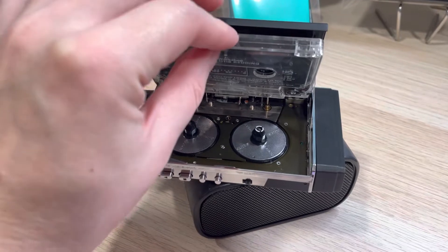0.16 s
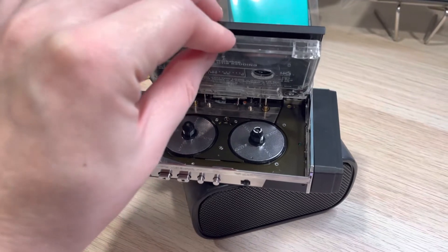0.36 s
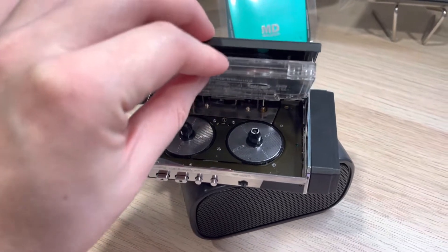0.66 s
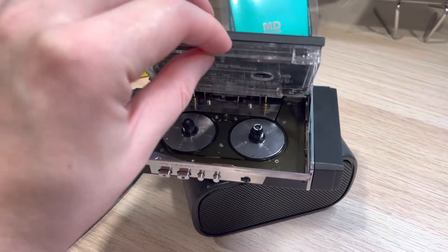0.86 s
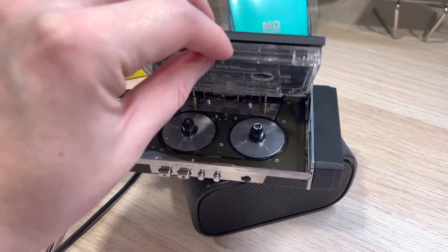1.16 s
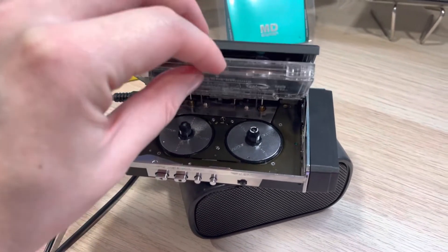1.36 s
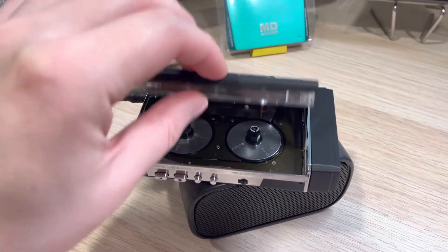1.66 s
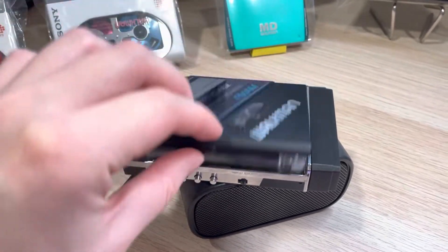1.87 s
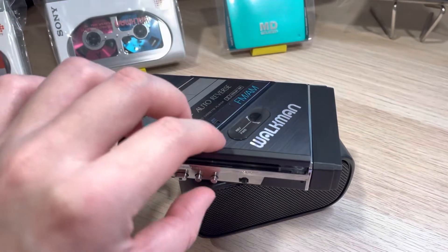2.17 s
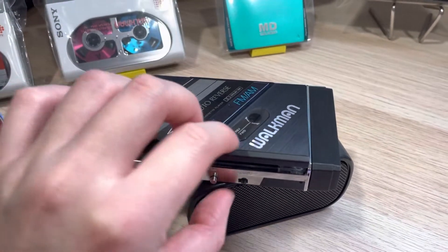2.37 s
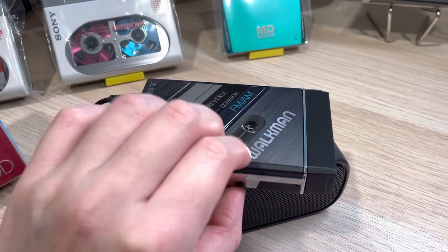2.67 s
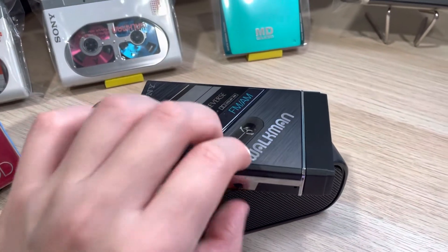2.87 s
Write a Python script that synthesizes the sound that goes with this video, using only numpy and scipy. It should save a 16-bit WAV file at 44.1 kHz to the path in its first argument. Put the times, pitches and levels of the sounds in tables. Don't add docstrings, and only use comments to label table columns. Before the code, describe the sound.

A plastic cassette is fitted into a small player, heard close in a quiet room with low hum. Small clicks and a brief scrape come near 0.4 seconds, light ticks at 0.8, and a sharp clack at 1.45. Rubbing leads to rattling clicks around 1.8-1.9, then near quiet. At 2.66 the latch snaps loudly, with a hollow low thump dying away quickly.

```python
import sys
import numpy as np
from scipy import signal
from scipy.fft import rfft, irfft
from scipy.io import wavfile
from scipy.ndimage import uniform_filter1d

SR = 44100
rng = np.random.default_rng(int(sys.argv[2]) if len(sys.argv) > 2 else 0)


def transcribe(signal):
    frames = np.atleast_2d(signal).T
    limited = np.clip(frames, -1, 1)
    pcm = np.round(limited * 32767).astype(np.int16)
    wavfile.write(sys.argv[1], SR, pcm)


def voltage_ratio(decibels):
    exponent = np.asarray(decibels, float) / 20
    return 10 ** exponent


N = 132300

# (frequency [Hz], level [dB per Hz])
HUSH_SPECTRUM = [(45, -8.5), (60, 0.5), (92, -13.5), (277, -14), (384, -23.5), (530, -16.5), (887, -36.5),
                 (16000, -65)]
# (frequency [Hz], likeness [0-1])
LIKENESS = [(60, 1), (240, 0.79), (950, 0.37), (4000, 0.13), (7000, 0.92)]
# (frequency [Hz], width [Hz], level [dB])
HUMS = [(57.7, 12.8, -54.5), (117.9, 30.6, -59), (248, 24, -78.5)]
# (start [s], length [s], level [dB], brightest [Hz], swell [0-1])
SCRAPES = [(0.013, 0.042, -69, 5940, 0.56), (0.043, 0.06, -70, 7000, 0.75), (0.374, 0.029, -47, 2500, 0.65),
           (0.401, 0.066, -74, 3030, 0.66), (0.513, 0.16, -65, 2290, 0.44),
           (0.767, 0.13, -68.5, 2350, 0.05), (1.12, 0.15, -81, 1450, 0.64),
           (1.293, 0.068, -62.5, 2360, 0.56), (1.413, 0.0533, -40.5, 2850, 0.83),
           (1.46, 0.017, -52, 1300, 0.4), (1.492, 0.15, -63, 2030, 0.76), (1.604, 0.15, -53.5, 3900, 0.67),
           (1.68, .15, -54.5, 2250, 0.69), (1.819, 0.042, -54.5, 2200, 0.21), (1.856, 0.055, -48, 2750, 0),
           (1.872, 0.028, -68, 4020, 0.7), (1.877, 0.032, -73, 2000, 0.2), (1.91, 0.026, -55, 3000, 0.77),
           (2.351, 0.13, -87, 5540, 0.67), (2.509, 0.058, -62.5, 2180, 0.08),
           (2.599, 0.036, -61.5, 2460, 0.52), (2.631, 0.035, -42, 1720, 0.83),
           (2.666, 0.013, -39.5, 2500, 0.05), (1.544, 0.45, -71, 10000, 0.4), (2.675, 0.13, -61, 3500, 0),
           (2.356, 0.075, -76.5, 9800, .4), (2.98, .02, -75.5, 3050, 1)]
# (start [s], length [s], level [dB], frequency [Hz], width [Hz])
SINGING_EDGES = [(0.02, 0.031, -58, 5060, 2500), (0.514, 0.043, -64.5, 1960, 252),
                 (.52, 0.15, -71.5, 2500, 130), (0.573, 0.076, -67.5, 1890, 250),
                 (1.3, 0.05, -68, 2550, 70), (1.419, 0.02, -62, 2590, 200), (1.675, 0.027, -56.5, 3980, 60),
                 (1.694, .025, -65, 1290, 200), (1.711, .03, -53, 4374, 70),
                 (1.735, 0.028, -53.5, 3360, 120), (1.727, 0.052, -83, 2350, 120),
                 (1.857, .014, -42.5, 2780, 200), (2.106, 0.024, -85, 5000, 200),
                 (2.246, 0.37, -86.5, 5150, 500), (0.869, 0.043, -76, 2324, 80)]
# (frequency [Hz], level [dB], t60 [s])
TRAY_MODES = [(610, -14, .03), (1020, -1.5, 0.044), (1253, -2.5, 0.05), (2030, 6.5, 0.0058),
              (2500, -5, 0.035), (3900, -20, .035), (4324, -7, 0.036), (5200, -5, 0.017),
              (6400, -10.5, 0.0053), (7130, -13, 0.028), (10140, 6, 0.0017), (11340, -3, .012)]
# (time [s], peak [dB], ring [Hz], brightness [dB per octave])
SHELL_TICKS = [(0.2007, -51, 1030, -8), (0.2076, -48, 2160, -6.5), (0.327, -44.5, 2040, -5.5),
               (0.3808, -32.5, 2110, -5), (0.3925, -28, 1550, -0.5), (0.3964, -33, 1590, -3.5),
               (0.7788, -45.5, 1300, -4), (0.7952, -34, 1680, -1), (0.819, -35, 2450, -3),
               (0.8259, -35.5, 6600, 1), (0.8321, -43.5, 1220, -1), (0.9488, -55.5, 980, 0.5),
               (1.171, -56, 1530, 2.5), (1.3018, -37.5, 1820, -2), (1.4453, -33, 1300, 6),
               (1.4574, -20.5, 1490, -0.5), (1.4668, -36.5, 1230, 1), (1.6222, -49, 1020, 0),
               (1.6454, -39, 4700, 3), (1.8188, -34.5, 1513, -6), (1.8487, -32, 1660, -10.5),
               (1.8551, -35.5, 2600, -1), (1.8812, -27, 1057, -3), (1.8953, -30.5, 3000, -3.5),
               (1.923, -43.5, 990, 12), (1.9275, -45, 2880, 15), (2.2537, -65.5, 1220, 2),
               (2.402, -49.5, 5200, 1), (2.5138, -61, 2010, -1), (2.6587, -24, 2160, -5.5)]
# (time [s], peak [dB], ring [Hz], brightness [dB per octave])
CATCH_CLICKS = [
    (0.816, -46, 11100, -15),
    (1.822, -38, 11150, 26),
    (1.8846, -21.5, 9900, 5),
    (2.6643, -18, 2110, 2),
    (2.6638, -18, 5000, 14.5),
    (2.6655, -20.5, 10230, 4.5),
]
# (time [s], peak [dB], ring
# [Hz], brightness [dB per octave])
FURTHER_TICKS = [(0.029, -50, 5200, 24), (0.094, -58, 4540, 2), (.529, -45, 1950, -3), (1.435, -50, 2600, -9),
                 (1.585, -43, 1610, 0), (1.699, -35.5, 3900, -5), (1.8495, -31.5, 5000, -1),
                 (1.8548, -35, 5000, -7), (1.8925, -35.5, 5200, -3), (2.515, -56, 1800, 1.5),
                 (2.547, -51.5, 2300, -2), (2.613, -42.5, 2500, -9.5), (2.623, -41, 4000, -9.5),
                 (2.6539, -32, 845, -7), (2.6591, -26, 775, -7.5), (2.682, -39.5, 7000, 3.5),
                 (2.812, -61.5, 2030, -0.5)]
# (frequency [Hz], level [dB], t60 [s])
SHELL_MODES = [(761, 0, 0.073), (1160, 2.5, 0.016), (1588, 1, 0.03), (1985, -11, 0.022), (2910, 6, 0.033),
               (3300, -10, 0.023), (4450, -12.5, 0.022), (5000, 0.5, 0.038), (6120, -7.5, 0.029),
               (8090, 9.5, 0.026), (10400, 6, 0.0041), (10800, -14, 0.01)]
# (frequency [Hz], level [dB])
GRIT_SPECTRUM = [(300, -10.5), (1000, -6.5), (2500, 8), (5000, -0.5), (8000, 2), (11500, -2), (13500, -2.5),
                 (16000, -14.5)]
# (time [s], level [dB], upper modes [dB per octave], signed direction [gain])
THUMPS = [(0.219, -49.5, -6, 0.82), (0.391, -45, 12, 0.87), (0.421, -52.5, -19, -1.6),
          (0.558, -49.5, 9.5, 1), (.62, -36.5, -8.5, 0.84), (0.829, -41.5, -2, -1.1),
          (1.004, -38, -6.5, 0.95), (1.4602, -34, 5, 0.62), (1.468, -34.5, 11.5, 0.72),
          (1.591, -44.5, 8, 0.81), (1.819, -45, 12.5, 0.54), (1.856, -42, 16.5, -0.8),
          (1.887, -51.5, 19, 1), (1.898, -35.5, 11, 1), (1.918, -49, 0, 0.74), (2.405, -43, -10, 0.41),
          (2.513, -35.5, 10, 0.61), (2.6657, -20.5, -5, 1), (2.6669, -28.5, -9, -1.1),
          (2.6719, -14.5, 3, 0.99), (2.73, -35, -9.5, 1), (1.8268, -42.5, 17.5, 0.41),
          (1.835, -50, 15.5, 0.71), (1.867, -40.5, 15.5, 0.53), (1.91, -47, 11.5, 0.82),
          (1.942, -42, -5.5, 1), (2.6809, -21, -3.5, 0.34), (1.77, -44.5, 3.5, 0.92)]
# (frequency [Hz], level [dB], t60 [s])
BOX_MODES = [(62.8, -7.5, 0.37), (91, -4.5, 0.18), (122.5, 5.5, 0.08), (172.6, -12.5, 0.15),
             (244.1, -4, 0.088), (307.5, -11, 0.073), (594, -26.5, 0.04), (799, -26.5, .03)]
# (frequency [Hz], t60 [s])
ROOM_T60 = [(100, 0.37), (500, 0.34), (2000, 0.22), (8000, 0.15)]
# (frequency [Hz], lead [radians])
PORT_LEAD = [(60, 0), (2100, .7), (3150, 2.2), (3900, .5), (6200, -.1), (7750, -2.9), (8900, -3.3),
             (10600, -6), (11900, -6.6), (13700, -9.1), (16100, -10.1)]
# (frequency [Hz], left over right [dB])
PORT_BALANCE = [(60, -2.5), (180, -4.5), (550, -1), (1300, -2.5), (2400, 1), (4970, 4.5), (7800, 2.2),
                (15000, -0.5)]

HUSH_DB, ROOM_DB = -56.5, -15.5
SLIPS_PER_S, SLIP_SPREAD_DB = 20000, 1.5
TRAY_DB, SCRAPE_FALL_DB = -2.5, 2.5
CRACK_RISE_S, CRACK_DECAY_S = 0.00019, 0.0013
CRACK_DB, SHELL_DB, RING_DB = -4, -11, -11.5
RING_T60_S, RING_SHORTENING = 0.02, 0.54
PUSH_S = 0.0017
BASS_EDGE_HZ, TREBLE_EDGE_HZ = 52, 16500


def unit_rms(x):
    return x / np.sqrt(np.mean(x ** 2) + 1e-20)


def read(points, hz):
    f, value = np.transpose(points)
    return np.interp(np.log(hz + 1), np.log(f + 1), value)


def add(mix, start_s, sound):
    part = mix[round(start_s * SR):][:len(sound)]
    part += sound[:len(part)]


def shaped(x, gain):
    hz = np.fft.rfftfreq(x.shape[-1], 1 / SR)
    return irfft(rfft(x) * gain(hz), x.shape[-1])


def resonant(x, center_hz, width_hz):
    return unit_rms(shaped(x, lambda f: 1 / (1 + (2 * (f - center_hz) / width_hz) ** 2)))


def rung(modes, length_s, upper_db=0, detune=1):
    hz, db, t60_s = np.transpose(modes)[:, :, None]
    t = np.arange(0, length_s, 1 / SR)
    level_db = db + upper_db * np.log2(hz / hz[2]) - 60 * t / t60_s
    return (voltage_ratio(level_db) * np.sin(2 * np.pi * hz * detune * t)).sum(0)


def paired(a, b):
    def same(f):
        return np.clip(read(LIKENESS, f), 0, 1)

    right = shaped(a, same) + shaped(b, lambda f: np.sqrt(1 - same(f) ** 2))
    return np.array([a, right])


def air():
    noise = paired(*rng.standard_normal((2, N)))
    out = voltage_ratio(HUSH_DB) * unit_rms(shaped(noise, lambda f: voltage_ratio(read(HUSH_SPECTRUM, f))))
    for hz, width_hz, db in HUMS:
        out += voltage_ratio(db) * resonant(rng.standard_normal(N), hz, width_hz)
    return out


def stick_slip():
    hits = rng.random(N) < SLIPS_PER_S / SR
    strength = rng.standard_normal(N) * voltage_ratio(SLIP_SPREAD_DB * rng.exponential(1, N))
    grip = unit_rms(uniform_filter1d(rng.standard_normal(N), 300))
    return hits * strength * voltage_ratio(1.7 * grip)


def scrapes():
    out = np.zeros(N)
    slips = stick_slip()
    rub = unit_rms(shaped(slips, lambda f: voltage_ratio(read(GRIT_SPECTRUM, f))))
    rub += voltage_ratio(TRAY_DB) * unit_rms(signal.oaconvolve(slips, rung(TRAY_MODES, 0.06))[:N])
    for start_s, length_s, db, bright_hz, swell in SCRAPES:
        u = np.arange(0, 1, 1 / (length_s * SR))
        warp = np.log(0.5) / np.log(np.clip(swell, 0.05, 0.95))
        stroke = np.sin(np.pi * u ** warp) ** 0.83
        piece = rub[round(start_s * SR):][:len(u)]
        piece = shaped(piece, lambda f: voltage_ratio(-SCRAPE_FALL_DB * np.log2((f + 100) / bright_hz) ** 2))
        add(out, start_s, voltage_ratio(db) * stroke * unit_rms(piece))
    for start_s, length_s, db, hz, width_hz in SINGING_EDGES:
        piece = slips[round(start_s * SR):][:round(length_s * SR)]
        piece = resonant(piece, hz, width_hz)
        add(out, start_s, voltage_ratio(db) * np.hanning(len(piece)) ** 0.73 * piece)
    return out


def ticks():
    out = np.zeros(N)
    t = np.arange(0, 0.06, 1 / SR)
    envelope = (1 - np.exp(-t / CRACK_RISE_S)) * np.exp(-t / CRACK_DECAY_S)
    for start_s, db, hz, tilt_db in SHELL_TICKS + CATCH_CLICKS + FURTHER_TICKS:
        grit = rng.standard_normal(len(t))
        blow = grit * envelope
        tilted = shaped(grit, lambda f: voltage_ratio(read(GRIT_SPECTRUM, f) + tilt_db * np.log2((f + 300) / 3000)))
        crack = tilted * envelope

        spot_level, spot_pitch = rng.standard_normal((2, len(SHELL_MODES), 1))
        struck = np.add(SHELL_MODES, 3 * spot_level * [0, 1, 0])
        body = rung(struck, 0.096, tilt_db, 1 + 0.06 * spot_pitch)
        shell = signal.fftconvolve(blow, body)[:len(t)]

        decay = voltage_ratio(-60 * t / RING_T60_S * (hz / 2000) ** RING_SHORTENING)
        ring = signal.fftconvolve(blow, decay * np.sin(2 * np.pi * hz * t))[:len(t)]

        parts = (crack, CRACK_DB), (shell, SHELL_DB), (ring, RING_DB)
        add(out, start_s, voltage_ratio(db) * sum(voltage_ratio(g) * p / abs(p).max() for p, g in parts))
    return out


def thumps():
    out = np.zeros(N)
    for start_s, db, upper_db, direction in THUMPS:
        add(out, start_s, direction * voltage_ratio(db - 5.5) * rung(BOX_MODES, 0.6, upper_db))
    push = np.hanning(round(PUSH_S * SR) + 3)
    return signal.oaconvolve(out, push / push.sum(), "same")


def room(x):
    taps = np.zeros((2, 22000))
    at = np.arange(200, 21980, 20) + rng.integers(0, 20, (2, 1089))
    np.put_along_axis(taps, at, rng.choice([-1., 1.], at.shape), 1)
    hz, t, z = signal.stft(taps, SR, nperseg=256)
    decay = voltage_ratio(-60 * t / read(ROOM_T60, hz)[:, None])
    tail = signal.istft(z * decay, SR, nperseg=256)[1]
    return signal.fftconvolve(x[None], tail / np.linalg.norm(tail[0]), axes=1)[:, :N]


def port(x, side):
    def gain(f):
        return voltage_ratio(side * read(PORT_BALANCE, f) / 2) * np.exp(0.5j * side * read(PORT_LEAD, f))

    return shaped(x, gain)


def scene():
    hush = air()
    near = scrapes() + ticks()
    low = thumps()
    wet = voltage_ratio(ROOM_DB) * paired(*room(near + voltage_ratio(-3.5) * low))
    left, right = near + low + hush + wet
    return np.array([port(left, 0.9), port(right, -1.14)])


def low_pass(x):
    return signal.sosfilt(signal.butter(12, 16530, fs=SR, output="sos"), x)


def record(dry):
    def response(f):
        treble = np.clip((TREBLE_EDGE_HZ - f) / 250, 0, 1)
        return treble / np.sqrt(1 + (BASS_EDGE_HZ / (f + 1)) ** 11)

    mix = shaped(dry, response)
    return low_pass(mix)


dry = scene()
out = record(dry)
transcribe(out)
```